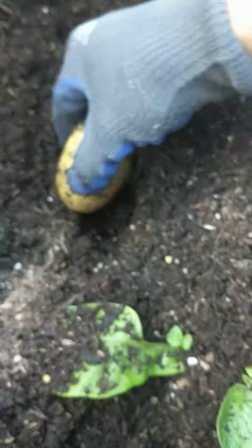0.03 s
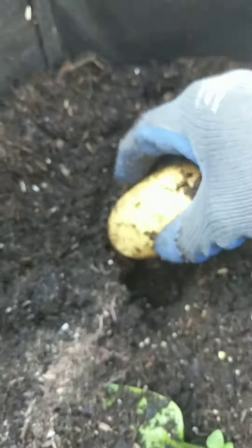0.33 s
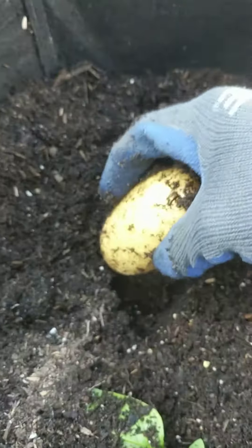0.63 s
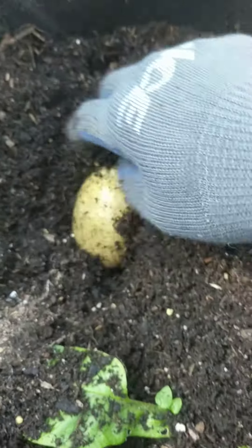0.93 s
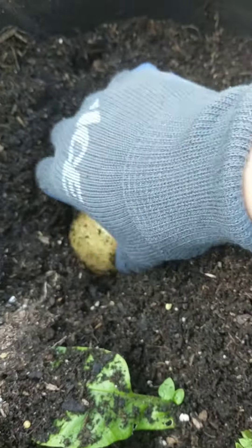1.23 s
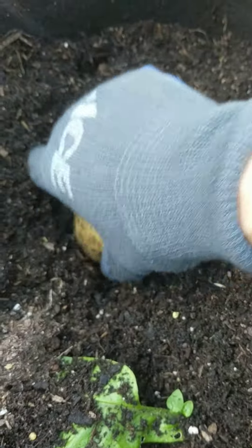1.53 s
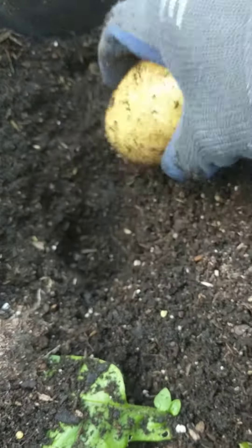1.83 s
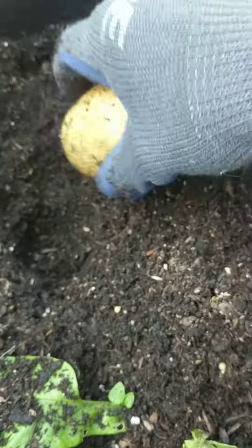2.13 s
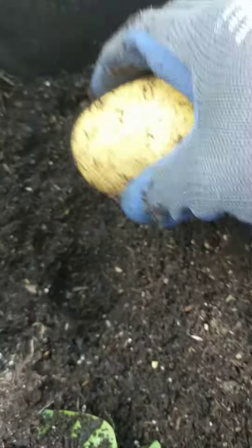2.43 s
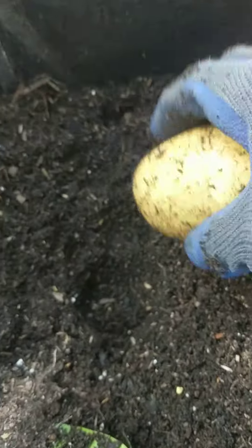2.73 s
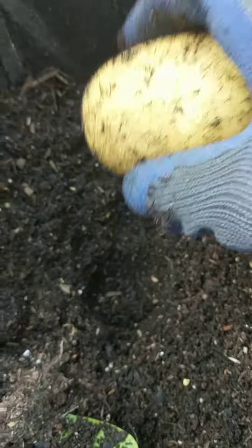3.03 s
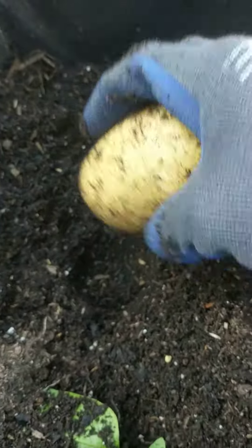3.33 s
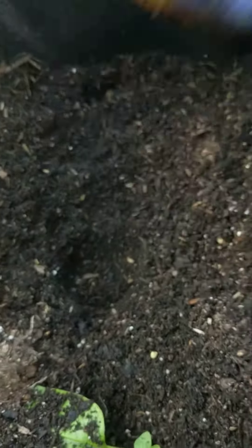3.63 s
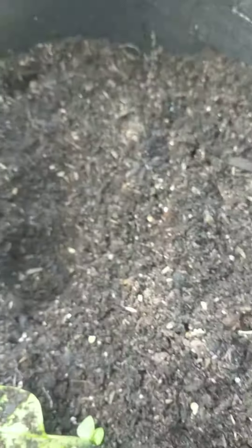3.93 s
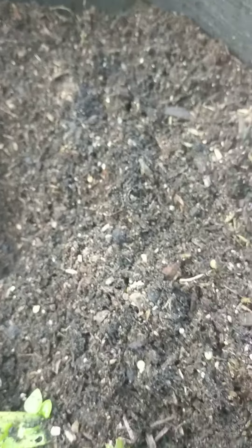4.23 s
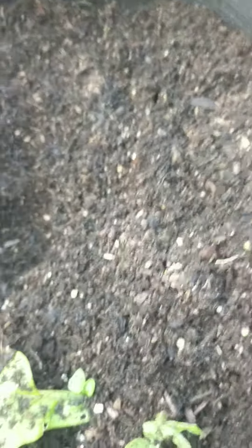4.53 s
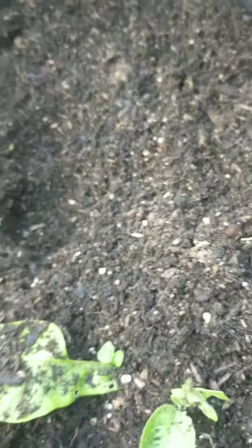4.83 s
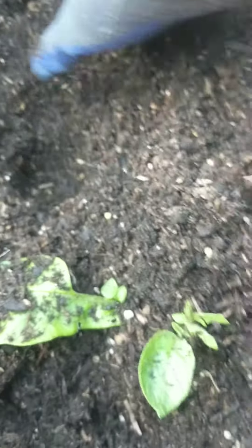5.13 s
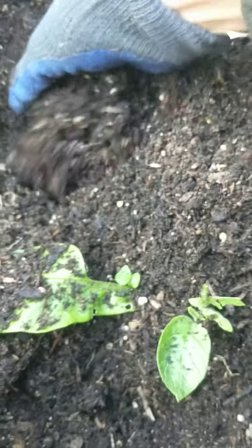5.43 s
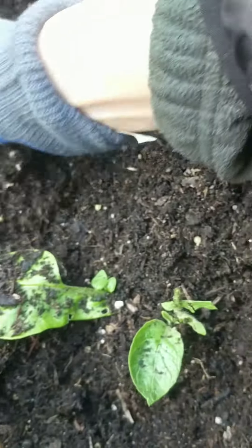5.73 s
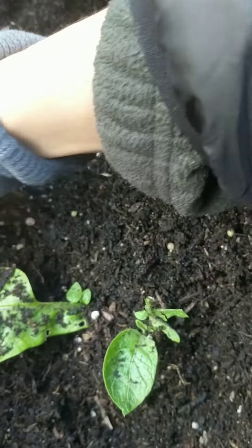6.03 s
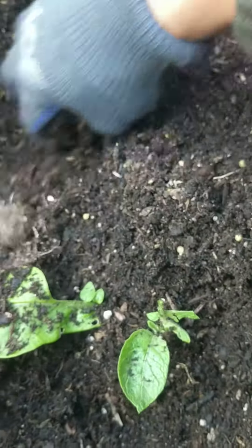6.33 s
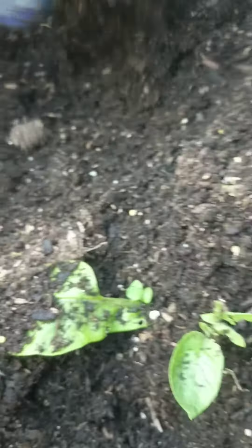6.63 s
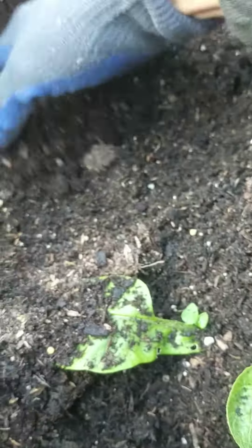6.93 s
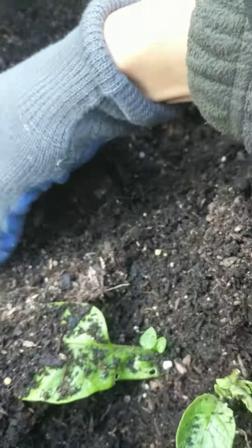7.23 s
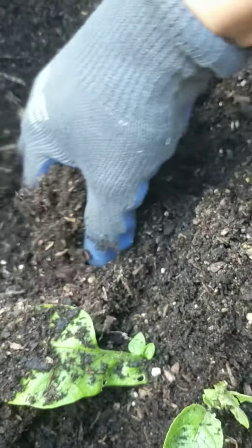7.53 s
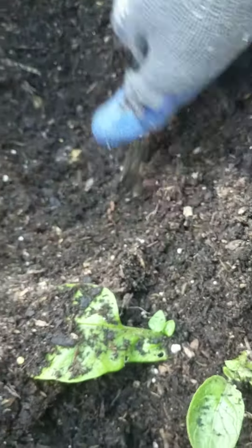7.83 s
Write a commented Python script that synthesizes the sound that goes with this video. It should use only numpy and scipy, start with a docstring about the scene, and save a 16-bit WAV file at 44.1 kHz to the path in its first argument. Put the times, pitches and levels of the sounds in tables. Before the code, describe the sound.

A gloved hand brushes softly through loose soil as it lifts a potato from a tub, with a fine gritty hiss and a few tiny snaps of crumbs. About halfway, gusts of wind rumble and thump on the close hand-held microphone, much louder than the digging, and fingers briefly rub its case. The wind eases and the soft scraping goes on over a low outdoor hush.

```python
"""First comes the soft brush of a glove and sleeve on loose soil, as a hand lifts a potato from a tub
and digs on. Tiny grains slip and hiss, crumbs snap, and the potato grinds on grit. Then gusts, the
loudest sound, push swirls of air (eddies) against the port, the opening of a hand-held microphone.
They rumble and thump, and the gain control ducks under them. Fingers rub the microphone's case;
behind it all are the outdoor air and a thin electronic whine."""
import sys
import numpy as np
from scipy import signal
from scipy.fft import rfft, irfft, next_fast_len
from scipy.io import wavfile
from scipy.ndimage import uniform_filter1d, minimum_filter1d

SR = 44100
rng = np.random.default_rng(int(sys.argv[2]) if len(sys.argv) > 2 else 0)


def pcm_store(signal):
    """Save signal as 16-bit PCM."""
    levels = np.round(np.clip(np.atleast_2d(signal), -1, 1) * 32767)
    wavfile.write(sys.argv[1], SR, levels.astype(np.int16).T)


N = 347949
TIME = np.arange(N) / SR


# The tones at which the port rings. Each row: pitch in Hz, width in Hz, gain in dB.
PORT_TONES = [(197, 44, -11.5), (307, 26, -11), (653, 320, -14.5)]

def wind(rumble_top_hz=182):
    """Large eddies rumble, strong gusts break them into smaller ones, and the port rings briefly."""
    rumble_db, flutter_db = wind_levels()
    swirl_db = (rumble_db + flutter_db) / 2 + 1
    unrest = drift(23)   # the flow is never even
    large = turbulence(per_s=510, hz=43.1, lowest_hz=47.6, even_s=0.055)
    middle = turbulence(per_s=350, hz=68.5, lowest_hz=129, even_s=0.028)
    small = turbulence(per_s=290, hz=116, lowest_hz=221, even_s=0.059) + from_db(-11) * pops()
    rumble = from_db(rumble_db + 2.5 + 2.65 * unrest) * cut(large, rumble_top_hz, "low")
    swirl = from_db(swirl_db + 1.1 * unrest) * middle
    flutter = from_db(flutter_db + 2.1 + 1.1 * unrest) * small
    gusts = rumble + swirl + flutter + buffets()
    return gusts + sum(from_db(db) * resonance(gusts, hz, width) for hz, width, db in PORT_TONES)


# The breeze between gusts. Each row: time in seconds, relative rumble level in dB.
BREEZE_LEVELS = [(1.55, -63), (2.13, -47.5), (2.8, -55), (3.85, -67), (4.25, -49), (4.5, -38), (5.55, -40),
                 (6.18, -58), (6.55, -47), (7.08, -43), (7.3, -55), (7.89, -49.5)]
# The gusts. Each row: arrival in seconds, hold in seconds, relative rumble level in dB,
# flutter compared with rumble in dB.
WIND_GUSTS = [(1.737, 0.026, -50, -35), (1.892, .11, -34, -25), (2.323, 0.15, -43, -25),
              (4.04, 0.047, -44.5, -36), (4.297, 0.094, -26.5, -22), (4.445, 0.15, -32, -27.5),
              (4.663, 0.091, -25, -9.5), (4.774, 0.065, -25.5, -10), (5.012, 0.098, -27.5, -13),
              (5.133, 0.11, -30.5, -11), (5.263, 0.052, -27, -17), (5.418, 0.0063, -25.5, -17.5),
              (5.591, 0.12, -28, -14.5), (5.75, 0.085, -27, -7.5), (5.862, 0.12, -28.5, -13),
              (6.043, 0.076, -29, -30), (6.244, 0.062, -31, -38), (6.331, 0.032, -29, -14.5),
              (6.39, 0.018, -25, -7), (6.498, 0.02, -30, -24.5), (6.751, 0.019, -40.5, -26),
              (6.859, .02, -40.5, -29), (6.965, 0.17, -43.5, -36)]

def wind_levels(rise_db_per_s=445, fall_db_per_s=331, flutter_speedup=2.16):
    """Gusts rise above the breeze, hold and drop; small eddies come and go faster than large ones."""
    rumble_db, = in_time(BREEZE_LEVELS)
    flutter_db = rumble_db - 24
    for arrival, hold, db, small_db in WIND_GUSTS:
        before = np.maximum(arrival - TIME, 0)
        after = np.maximum(TIME - arrival - hold, 0)
        fade_db = rise_db_per_s * before + fall_db_per_s * after
        rumble_db = np.maximum(rumble_db, db - fade_db)
        flutter_db = np.maximum(flutter_db, db + small_db - flutter_speedup * fade_db)
    return rumble_db, flutter_db


def eddy(t, hz):
    """A passing swirl of air gives a push, then a pull, quicker for small swirls; peak 1."""
    phase = 2 * np.pi * hz * t
    return -16 / np.sqrt(27) * phase / (1 + phase ** 2) ** 2


def eddy_stream(per_s, hz, spread_db):
    """Eddies of one size pass at random moments."""
    shape = eddy(np.arange(-2000, 2001) / SR, hz)
    return signal.fftconvolve(grains(per_s, spread_db), shape, "same")


def turbulence(per_s, hz, lowest_hz, even_s):
    """Crowded eddies merge into a rush, its level evened out over about even_s seconds."""
    stream = cut(eddy_stream(per_s, hz, spread_db=3.5), lowest_hz, "high", order=3)
    power = smooth(stream ** 2, int(even_s * SR))
    return stream / np.sqrt(np.abs(power) + 1e-9)


def pops():
    """Stray tiny eddies come singly and make the flutter ragged."""
    return rms_one(cut(eddy_stream(per_s=61, hz=198, spread_db=1.0), 150, "high"))


# Hard eddies hitting the port. Each row: time in seconds, relative level in dB, pitch in Hz.
HARD_EDDIES = [(1.902, -18, 46), (1.954, -17.5, 66), (1.978, -16, 48), (2.042, -21.5, 40), (2.326, -24, 38),
               (4.308, -18, 75), (4.373, -14.5, 165), (4.396, -14, 60), (4.651, -15, 104),
               (4.679, -12, 177), (4.705, -17, 105), (4.737, -10, 192), (4.791, -15, 115),
               (4.824, -12, 185), (4.871, -15, 72), (5.034, -9.5, 240), (5.042, -13, 110),
               (5.059, -13.5, 198), (5.067, -8, 270), (5.098, -18, 120), (5.131, -19, 151),
               (5.178, -20, 150), (5.22, -12.5, 275), (5.263, -21, 135), (5.289, -17, 70),
               (5.309, -20, 110), (5.427, -12.5, 66), (5.624, -14.5, 174), (5.685, -17, 112),
               (5.761, -12, 100), (5.801, -16, 130), (5.829, -15.5, 191), (5.875, -13, 120),
               (5.927, -21, 170), (5.941, -17.5, 130), (5.963, -14.5, 70), (6.022, -15.5, 112),
               (6.07, -17.5, 85), (6.085, -15, 58), (6.112, -19.5, 84.4), (6.357, -18, 94),
               (6.392, -15, 75), (6.402, -15.5, 133)]

def buffets(gap_s=0.00321, side_db=-6.5):
    """A hard eddy breaks on the port's rim: a weaker one of opposite spin leads, one alike follows."""
    out = np.zeros(N)
    for s, db, hz in HARD_EDDIES:
        near = slice(int((s - .05) * SR), int((s + .05) * SR))
        t = TIME[near] - s
        lag, lag_pitch, lead, lead_pitch = rng.uniform(.55, 1.45, 4)
        following = eddy(t - gap_s * lag, hz * np.sqrt(lag_pitch))
        leading = -eddy(t + gap_s * lead, hz * np.sqrt(lead_pitch))
        out[near] += from_db(db - 3) * (eddy(t, hz) + from_db(side_db) * (leading + following))
    return cut(cut(out, 51, "high"), 3000, "low", order=3)


# The tone of coarse soil, then of fine soil. Each row: frequency in Hz, relative level in dB.
SCRAPE_TONE = [(500, -10.5), (1200, 7.5), (2200, 6.5), (3200, 1.5), (4500, -3.5), (6500, -13), (12000, -18)]
HISS_TONE = [(2000, -20), (3400, -1.5), (4300, 6), (5400, 2.5), (6200, 3), (9000, 0), (12000, -2),
             (16000, -3.5)]

def brushing():
    """Knit and rubber drag through soil: countless grains slip, coarse ones lower than fine ones."""
    coarse_gain, fine_gain = hand_strokes()
    catching = drift(22)   # the glove catches and lets go
    scrape = coloured(grains(per_s=5500, spread_db=2.0), SCRAPE_TONE) + from_db(-9.5) * grit()
    hiss = coloured(grains(per_s=18000, spread_db=3.0), HISS_TONE)
    scrape = tub_echoes(shifting_contact(scrape)) * from_db(0.26 + 0.5 * catching)
    hiss = tub_echoes(shifting_contact(hiss)) * from_db(-0.87 + 0.7 * catching)
    return coarse_gain * scrape + fine_gain * hiss


# The glove's light, constant rustle. Each row: time in seconds, relative level in dB.
RUSTLE_LEVELS = [(0, -73.5), (.5, -70.5), (.95, -76), (1.3, -72.5), (2.1, -71.5), (2.55, -68.5),
                 (3.4, -69.5), (4.3, -75.5), (5.15, -74), (5.7, -62), (5.99, -88), (6.15, -76),
                 (6.7, -67.5), (7.89, -72.5)]
# Strokes over the soil. Each row: fastest moment in seconds, length in seconds,
# relative scrape level in dB, hiss compared with scrape in dB.
GLOVE_STROKES = [(0.35, .07, -64.5, -6), (0.528, 0.064, -64, -15), (0.795, 0.065, -61.5, -3),
                 (1.102, 0.058, -66.5, -2.5), (1.23, 0.1, -66, -5), (1.452, 0.036, -67.5, -2),
                 (1.638, 0.045, -64.5, -2.5), (1.865, 0.12, -67, -1.5), (2.236, 0.037, -63.5, -5),
                 (3.113, 0.014, -62.5, -5), (3.837, 0.16, -65, -2), (4.2, 0.17, -66.5, -4),
                 (4.567, 0.13, -66.5, -3), (4.937, 0.085, -66.5, -6), (5.407, 0.094, -70.5, 5),
                 (5.582, 0.098, -57.5, -1), (5.817, 0.12, -64, -7), (6.114, 0.084, -65, -0.5),
                 (6.388, 0.14, -59.5, -1), (6.82, 0.12, -63, -12), (7.036, 0.11, -60.5, -8),
                 (7.323, 0.14, -62.5, -20), (7.445, 0.26, -62.5, -0.5), (7.67, 0.12, -60, -1.5)]

def hand_strokes(rise=1.12, fall=0.95, roundness=1.74):
    """Each stroke speeds up and slows down, lifting the scrape and hiss above the rustle."""
    t = TIME[::64]
    rustle_db = np.interp(t, *np.transpose(RUSTLE_LEVELS))
    coarse_power, fine_power = from_db(rustle_db) ** 2, from_db(rustle_db - 0.5) ** 2
    for s, length, db, hiss_db in GLOVE_STROKES:
        away = np.maximum((s - t) / rise, (t - s) / fall) / length
        swell = from_db(db) * np.exp(-np.minimum(away, 10) ** roundness)
        coarse_power += swell ** 2
        fine_power += (from_db(hiss_db) * swell) ** 2
    return [np.interp(TIME, t, np.sqrt(power)) for power in (coarse_power, fine_power)]


def grit(per_s=460, pitch_count=12):
    """Larger grains flick past each other, each ringing briefly at its own pitch."""
    rings = (resonance(grains(per_s / pitch_count, spread_db=3.0), hz, hz / 6) / hz
             for hz in np.geomspace(1500, 6000, pitch_count))
    return rms_one(sum(rings))


def shifting_contact(x, depth_db=1.4, change_hz=24):
    """The glove's contact keeps changing, so each half octave swells and fades on its own."""
    spectrum, hz, size = frequencies(x)
    half_octaves = np.clip(2 * np.log2(hz / 1000), 0, 8)
    out = np.zeros(N)
    for k in range(9):
        band = np.maximum(1 - np.abs(half_octaves - k), 0)
        out += irfft(spectrum * band, size)[:N] * from_db(depth_db * drift(change_hz))
    return rms_one(out)


# Echoes off the tub's wall. Each row: average delay in milliseconds, gain.
TUB_ECHOES = [(1.3, 0.25), (2.1, .25)]

def tub_echoes(x, wander=0.11, wander_hz=2.9):
    """Quick echoes colour the sound; their delays wander as the hand moves."""
    echoes = np.zeros(N)
    for ms, gain in TUB_ECHOES:
        delay_s = ms / 1000 * (1 + wander * drift(wander_hz))
        echoes += gain * np.interp(TIME - delay_s, TIME, x)
    return rms_one(x + echoes)


# Crumbs and bits of bark snapping, and at 1.64 s the potato knocking. Each row: start in seconds, # relative
# level in dB, pitch in Hz, fading time in cycles.
CRUMB_SNAPS = [(0.696, -52, 1370, 1.4), (0.735, -50, 5000, .6), (0.79, -50, 2400, 1),
               (1.110, -51, 2580, 0.65), (1.6422, -47.5, 2400, 2.4), (1.969, -50, 2500, .5),
               (2.012, -44.5, 2630, .7), (2.566, -48.5, 3400, .5), (3.044, -46, 3380, 0.57),
               (3.283, -48.5, 3200, .5), (3.357, -54, 2800, .6), (3.447, -49, 3500, 0.59)]

def crumbs():
    """Each snap or knock is one dry click, over within a few cycles in the soft soil."""
    out, t = np.zeros(N), TIME[:400]
    for s, db, hz, cycles in CRUMB_SNAPS:
        click = np.cos(2 * np.pi * hz * t) * np.exp(-hz * t / cycles)
        click = cut(click, hz / 2, "high", order=1)
        at = int(s * SR)
        out[at:at + len(t)] += from_db(db + 8) * click / np.abs(click).max()
    return cut(out, 6900, "low")


# The potato pressing on grit. Each row: middle in seconds, level in dB, length in seconds.
POTATO_PRESSES = [(.789, -59.5, .006), (.811, -54.5, .015), (.845, -59.5, .005)]
# The tones of that crunch. Each row: pitch in Hz, width in Hz, relative level in dB.
CRUNCH_TONES = [(1920, 300, -5), (2400, 320, 6), (2780, 270, 5), (4050, 870, -14)]

def potato_crunch(slips_per_s=380, uneven=0.44):
    """The potato's skin sticks and slips on grit in a short, uneven run."""
    pace = slips_per_s * np.exp(uneven * drift(300))
    slips = ticks(pace) * from_db(3.0 * drift(300))
    ringing = sum(from_db(db) * resonance(slips, hz, width) for hz, width, db in CRUNCH_TONES)
    pressing = sum(from_db(db) * np.exp(-np.minimum(((TIME - s) / length) ** 4, 36))
                   for s, db, length in POTATO_PRESSES)
    return pressing * rms_one(ringing)


# Gaps under the cupped glove. Each row: middle in seconds, length in seconds, pitch in Hz, level in dB.
GLOVE_GAPS = [(2.235, 0.017, 2130, -66), (5.52, 0.022, 1350, -63), (5.585, 0.026, 2360, -65),
              (5.595, 0.045, 3130, -67), (6.834, 0.1, 1800, -67), (7.328, .04, 1750, -61.5),
              (7.34, .02, 3550, -65), (7.42, .1, 4770, -76)]

def hollows(width_hz=490):
    """The gap between glove and soil rings while a deep stroke holds it open."""
    out, slips = np.zeros(N), grains(per_s=3100, spread_db=1.5)
    for s, length, hz, db in GLOVE_GAPS:
        ringing = resonance(resonance(slips, hz, width_hz), hz, width_hz)
        out += from_db(db) * swell_at(s, length) * rms_one(ringing)
    return out


# Flicks of the glove. Each row: middle in seconds, level in dB, length in seconds.
KNIT_FLICKS = [(.787, -66, .012), (3.112, -71, .01), (7.05, -68, .025), (7.22, -75, .03), (7.335, -71, .02),
               (7.422, -63, .014)]
# Their bright tone. Each row: frequency in Hz, relative level in dB.
FLICK_TONE = [(5000, -30), (9000, 3), (12500, 7), (16000, 0)]

def knit_flicks():
    """The knit flicks over dry crumbs with a short, high hiss."""
    return friction(KNIT_FLICKS, FLICK_TONE)


# Finger scuffs, then hand rubs, on the case. Each row: middle in seconds, level in dB, length in seconds.
FINGER_SCUFFS = [(.642, -67, 0.0043), (4.230, -58, 0.0039), (4.417, -53, 0.0017), (4.431, -49, 0.0011),
                 (4.440, -47, 0.0024), (4.512, -48, 0.0019), (4.577, -56.5, 0.0054), (4.957, -55, 0.0017),
                 (4.965, -60, .003)]
HAND_RUBS = [(4.243, -42.5, 0.013), (4.272, -44, 0.006), (4.436, -35, 0.0058), (4.461, -41.5, 0.0047),
             (4.975, -40, 0.0089)]
# The tone of each. Each row: frequency in Hz, relative level in dB.
SCUFF_TONE = [(600, -5), (1500, 3), (3000, -6.5), (8000, -10.5), (16000, -14)]
RUB_TONE = [(100, -7), (300, 7.5), (800, -5), (1400, -14), (3000, -37), (8000, -64)]

def case_handling():
    """Fingers shift crisply on the microphone's case, and the holding hand rubs it dully."""
    return friction(FINGER_SCUFFS, SCUFF_TONE) + friction(HAND_RUBS, RUB_TONE)


def friction(slides, tone):
    """Brief slides swell and fade, each a dense run of tiny slips."""
    swell = sum(from_db(db) * swell_at(s, length) for s, db, length in slides)
    return swell * coloured(grains(per_s=7000, spread_db=3.0), tone)


# The tone of the outdoor air. Each row: frequency in Hz, relative level in dB.
AIR_TONE = [(15, -15), (25, -14.5), (64, 4.5), (133, 0), (223, -2.5), (393, -12), (515, -14.5),
            (884, -15.5), (2750, -37), (4720, -39), (6520, -61), (7080, -54), (9270, -44.5), (13900, -59),
            (15900, -58)]

def outdoor_air(bass_hz=220, bass_swing_db=1.6):
    """A low hush, a little restless, most of all in the bass."""
    air = from_db(-49 + .5 * drift(5.6)) * coloured(rng.standard_normal(N), AIR_TONE)
    bass_gain = from_db(bass_swing_db * drift(8.9) - 1)
    return air + cut(air, bass_hz, "low", order=1) * (bass_gain - 1)


# The wandering whine. Each row: time in seconds, pitch in Hz, relative level in dB.
WHINE_PATH = [(0, 7120, -84), (1.9, 7040, -83), (2.2, 7300, -81), (3.3, 7360, -82), (3.8, 7360, -82),
              (4.0, 7080, -81), (5.0, 7260, -87), (6.3, 7190, -81.5), (7.89, 7360, -82)]

def electronic_whines(waver_hz=80, steady_hz=11644):
    """The electronics give two thin whines: one wanders, one stays near its pitch."""
    hz, db = in_time(WHINE_PATH)
    wandering = from_db(db + 1.5 + 3.0 * drift(60)) * sine(hz + waver_hz * drift(160))
    steady = from_db(-92.5 + 2.5 * drift(8)) * sine(steady_hz + 8 * drift(30))
    return wandering + steady


# Runs of a tiny motor. Each row: middle in seconds, level in dB, half the length in seconds.
MOTOR_RUNS = [(0.586, -73, .06), (0.847, -78, 0.043)]
# Its tone. Each row: frequency in Hz, relative level in dB.
MOTOR_TONE = [(2500, -24), (4900, -1), (6400, -8), (8400, -1), (9200, 1), (9900, -4), (11000, -25)]

def motor_buzz(steps_per_s=700, fade_s=.006):
    """A tiny motor, perhaps focusing a lens, steps so fast that it buzzes faintly."""
    steps = ticks(steps_per_s * (1 + 0.0086 * drift(200)))
    running = sum(from_db(db) * np.clip((half - np.abs(TIME - s)) / fade_s, 0, 1)
                  for s, db, half in MOTOR_RUNS)
    return running * coloured(steps, MOTOR_TONE)


def from_db(db):
    """Turns decibels into a gain."""
    return 10 ** (np.asarray(db) / 20)


def rms_one(x):
    """Scales x to an average level (rms) of 1."""
    return x / np.sqrt(np.mean(x ** 2) + 1e-20)


def in_time(rows):
    """Joins timed rows with straight lines, giving one curve per value column."""
    s, *columns = np.transpose(rows)
    return [np.interp(TIME, s, column) for column in columns]


def cut(x, hz, kind, order=2):
    """Keeps the "low" or the "high" side of hz."""
    return signal.sosfilt(signal.butter(order, hz, kind, fs=SR, output="sos"), x)


def resonance(x, hz, width):
    """Lets x ring around one pitch."""
    return signal.lfilter(*signal.iirpeak(hz, max(hz / width, 1), fs=SR), x + 1e-18)


def frequencies(x):
    """Gives the spectrum of x, its frequencies in Hz and the padded length."""
    size = next_fast_len(N)
    return rfft(x, size), np.maximum(np.fft.rfftfreq(size, 1 / SR), 1), size


def coloured(x, tone):
    """Shapes x with a tone table; average level 1."""
    tone_hz, db = np.transpose(tone)
    spectrum, hz, size = frequencies(x)
    gain = from_db(np.interp(np.log(hz), np.log(tone_hz), db))
    return rms_one(irfft(spectrum * gain, size)[:N])


def drift(hz):
    """A random wobble of typical size 1, mostly slower than hz."""
    count = N // 32
    bins = np.fft.rfftfreq(count, N / count / SR)
    slow = irfft(rfft(rng.standard_normal(count)) / (1 + (bins / hz) ** 2), count)
    return np.interp(np.arange(N) * count / N, np.arange(count), rms_one(slow))


def grains(per_s, spread_db):
    """Random clicks of uneven size and sign."""
    chance, size = rng.random((2, N))
    out, born = np.zeros(N), chance < per_s / SR
    signed = 2 * size[born] - 1
    strength = np.minimum(-np.log(np.abs(signed) + 1e-9), 4)
    out[born] = np.sign(signed) * from_db(spread_db * strength)
    return out


def ticks(per_s):
    """Clicks that follow a changing pace."""
    return np.diff(np.floor(np.cumsum(per_s) / SR), prepend=0)


def sine(hz):
    """A pure tone that follows a changing pitch."""
    return np.sin(2 * np.pi * np.cumsum(hz) / SR)


def swell_at(s, length):
    """A bell-shaped swell: 1 at time s, about 0.6 one length to either side."""
    out, near = np.zeros(N), np.abs(TIME - s) < 5 * length
    out[near] = np.exp(-.5 * ((TIME[near] - s) / length) ** 2)
    return out


def smooth(x, size):
    """Averages twice over size samples."""
    return uniform_filter1d(uniform_filter1d(x, size), size)


def scene():
    """Wind on the port, the hand in the soil, the hold on the case, and the quiet behind them."""
    handling = case_handling()
    soil = brushing() + hollows() + crumbs() + potato_crunch() + knit_flicks()
    mix = wind() + soil + handling + outdoor_air() + electronic_whines() + motor_buzz()
    return mix[None]   # one channel


def gain_control(x, threshold_db=-27.0, share=0.16, release_db_per_s=10.0, attack_hz=14):
    """Loud moments turn the gain down; it creeps back afterwards."""
    duck_db = share * np.maximum(20 * np.log10(np.abs(x) + 1e-9) - threshold_db, 0)
    recovery_db = release_db_per_s * TIME
    held_db = np.maximum.accumulate(duck_db + recovery_db, axis=-1) - recovery_db
    return x * from_db(-cut(held_db, attack_hz, "low", order=1))


def limiter(x, top=0.23, size=220):
    """The gain dips smoothly for a few milliseconds around any peak above the top."""
    gain = minimum_filter1d(top / np.maximum(np.abs(x), top), 2 * size)
    return x * smooth(gain, size)


def record(dry, lowest_hz=40.4, highest_hz=15800):
    """Deep bass is dropped, gusts duck the gain, peaks are limited, the highest treble is cut."""
    trimmed = cut(dry, lowest_hz, "high", order=6)
    limited = limiter(gain_control(trimmed))
    return signal.sosfilt(signal.ellip(10, .1, 80, highest_hz, fs=SR, output="sos"), limited)


dry = scene()
out = record(dry)
pcm_store(out)
```